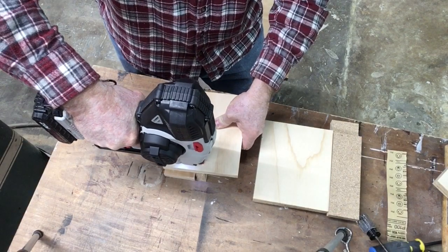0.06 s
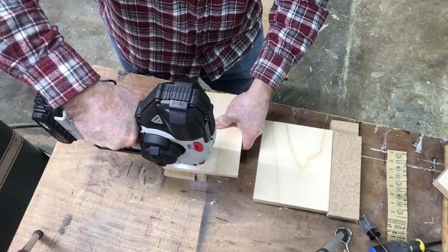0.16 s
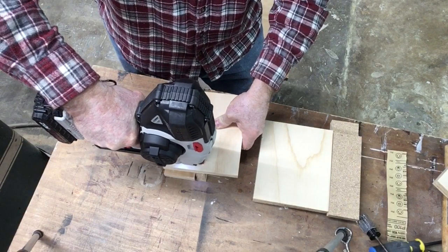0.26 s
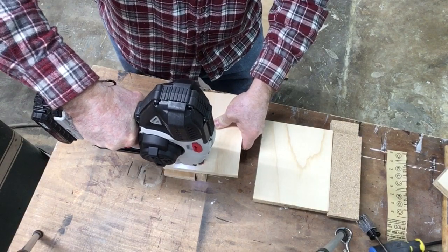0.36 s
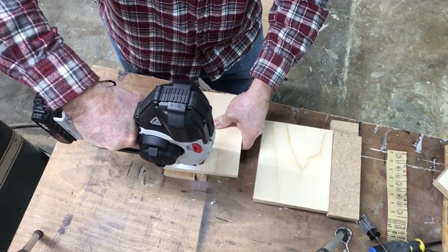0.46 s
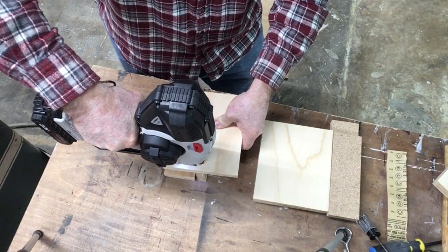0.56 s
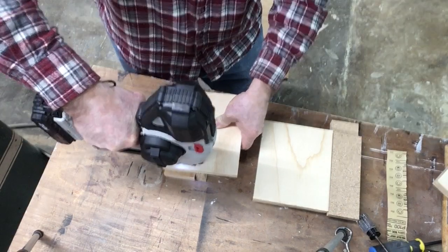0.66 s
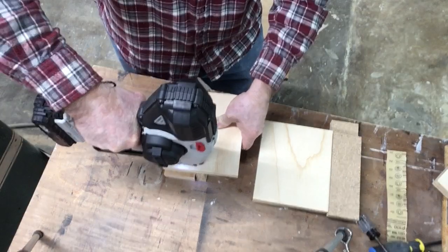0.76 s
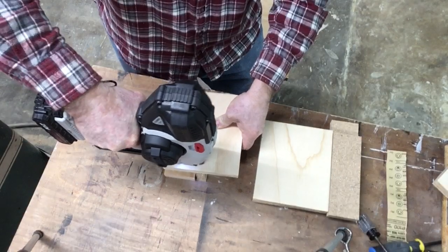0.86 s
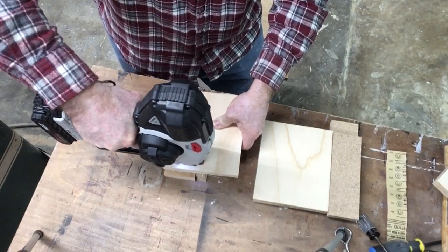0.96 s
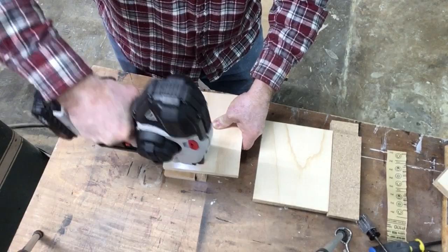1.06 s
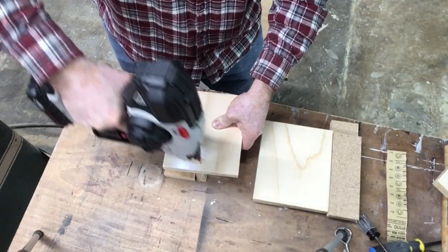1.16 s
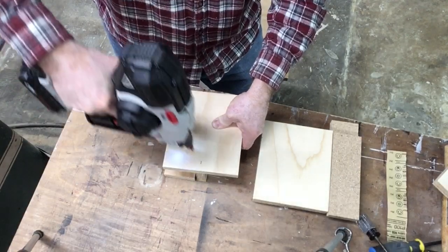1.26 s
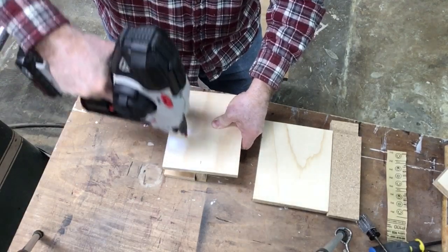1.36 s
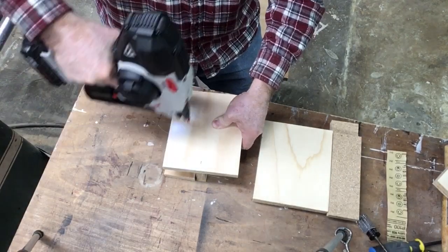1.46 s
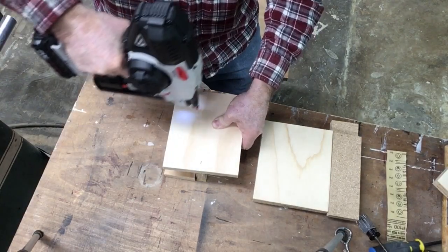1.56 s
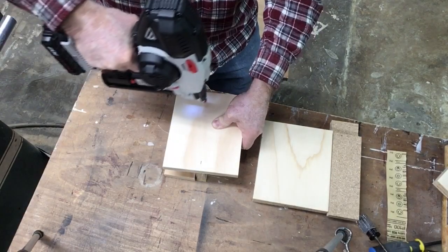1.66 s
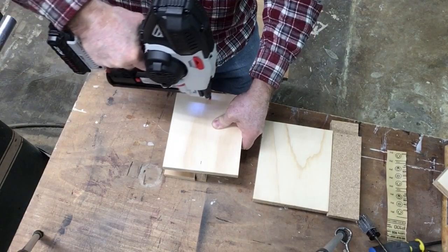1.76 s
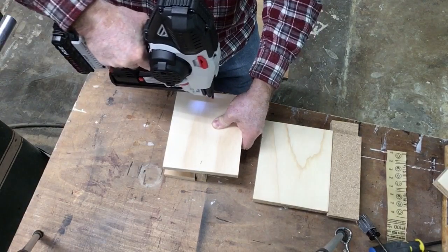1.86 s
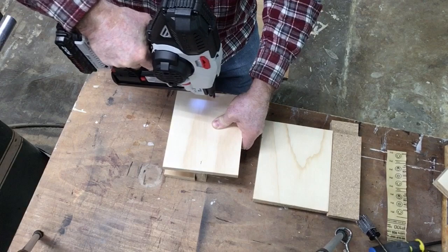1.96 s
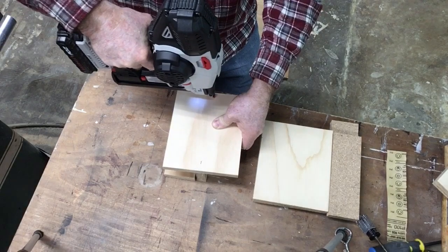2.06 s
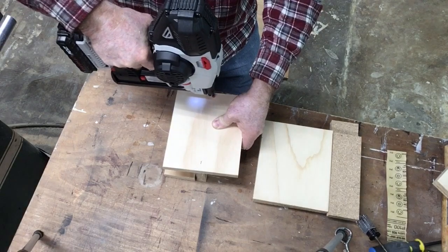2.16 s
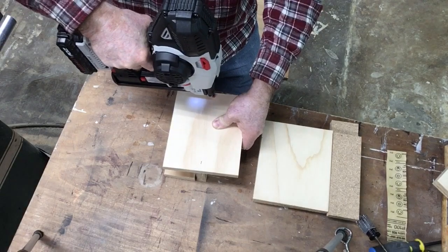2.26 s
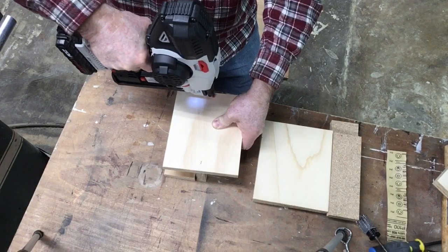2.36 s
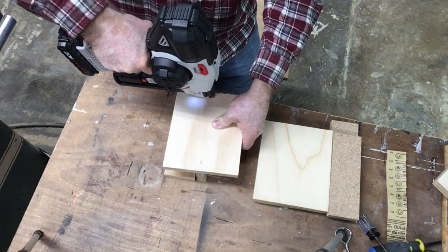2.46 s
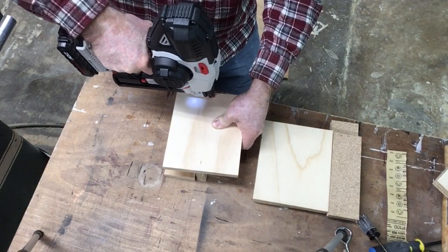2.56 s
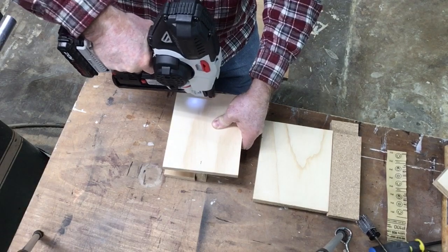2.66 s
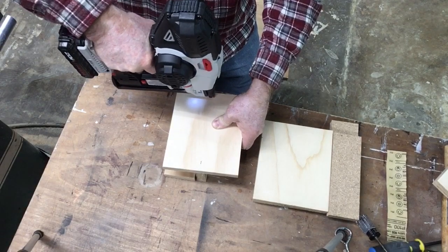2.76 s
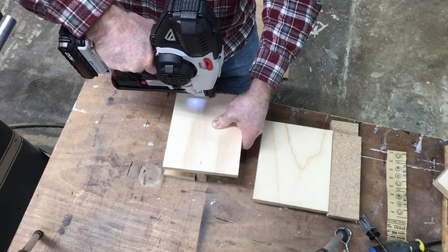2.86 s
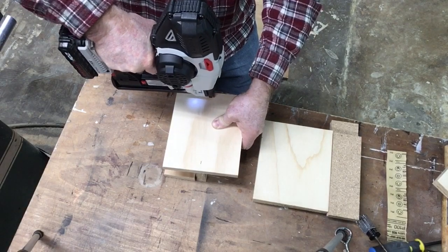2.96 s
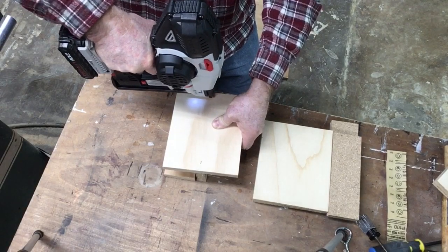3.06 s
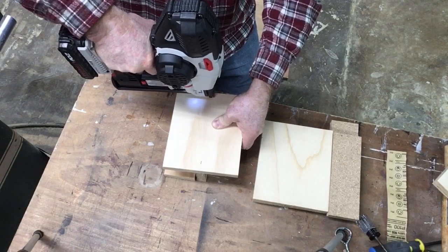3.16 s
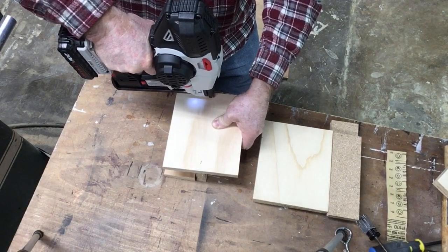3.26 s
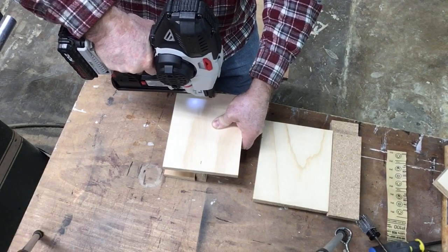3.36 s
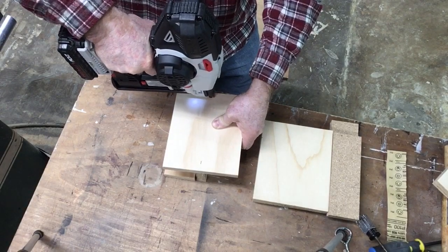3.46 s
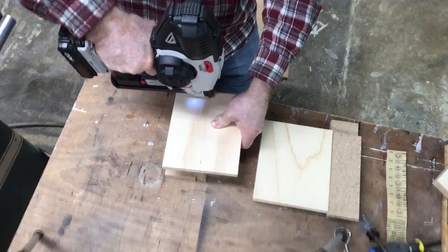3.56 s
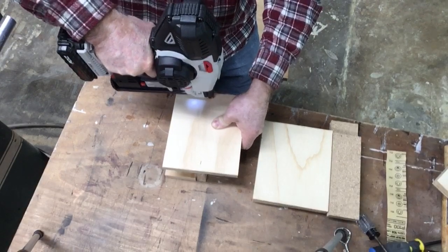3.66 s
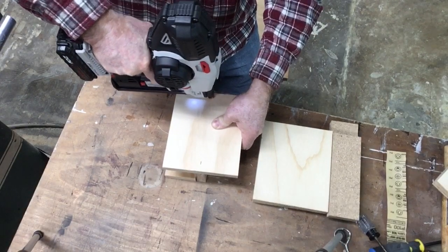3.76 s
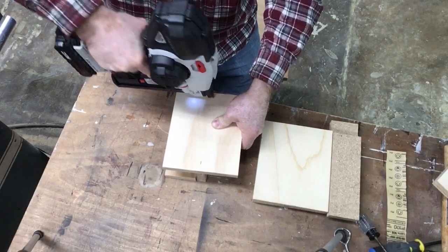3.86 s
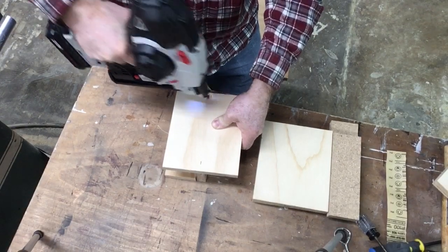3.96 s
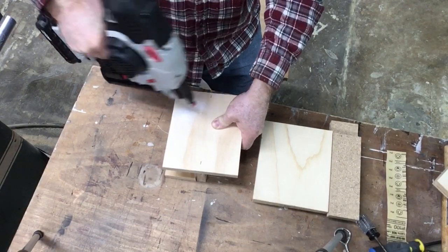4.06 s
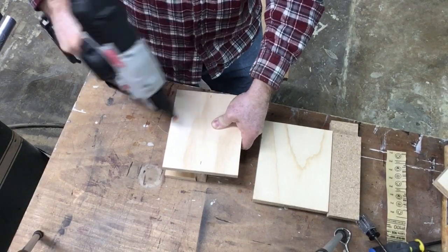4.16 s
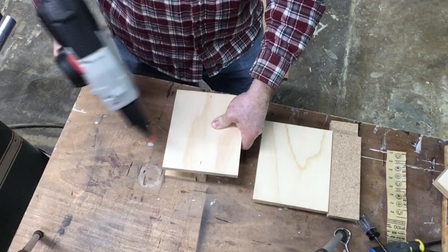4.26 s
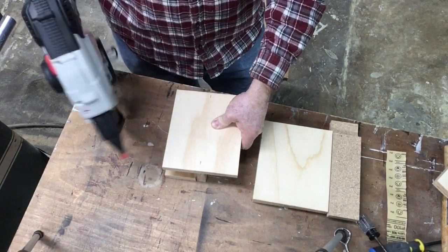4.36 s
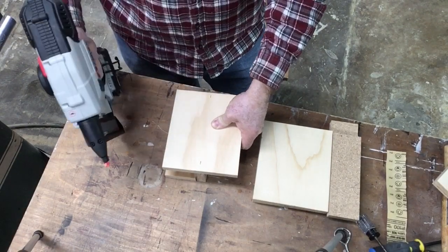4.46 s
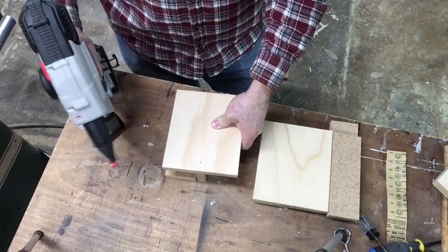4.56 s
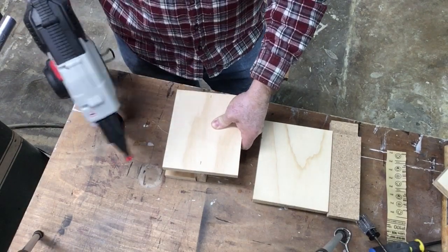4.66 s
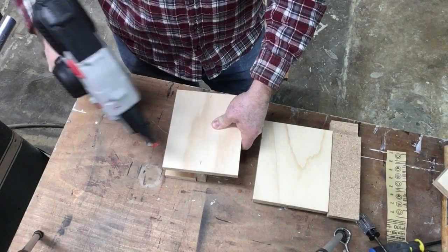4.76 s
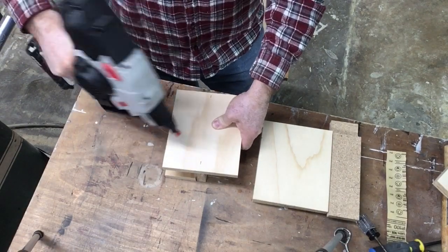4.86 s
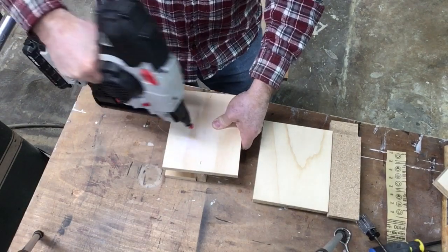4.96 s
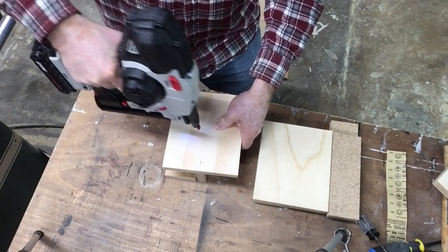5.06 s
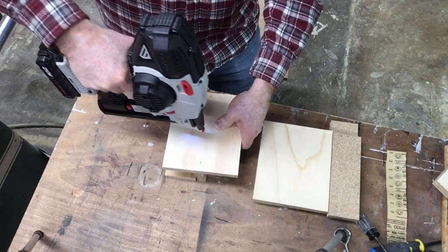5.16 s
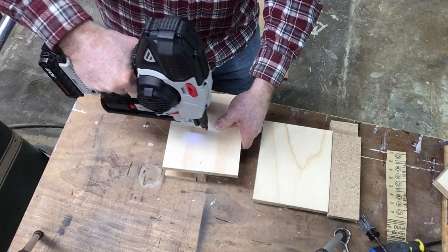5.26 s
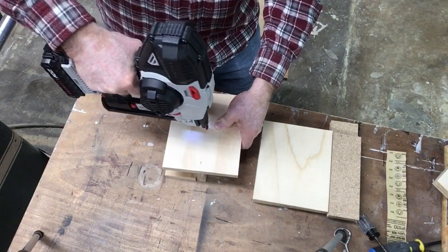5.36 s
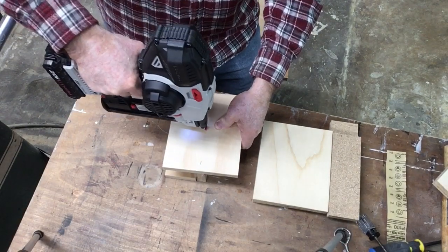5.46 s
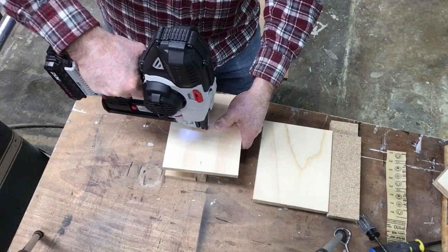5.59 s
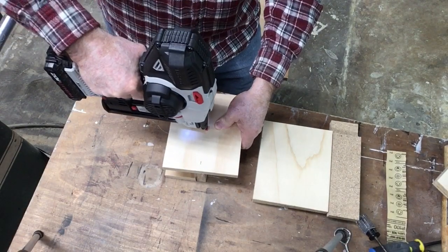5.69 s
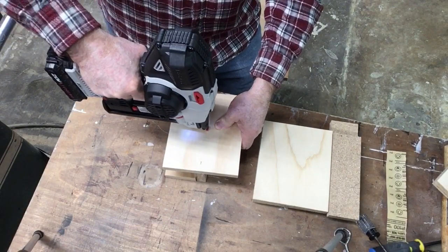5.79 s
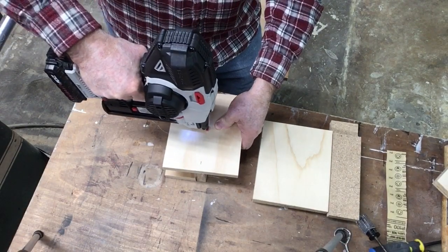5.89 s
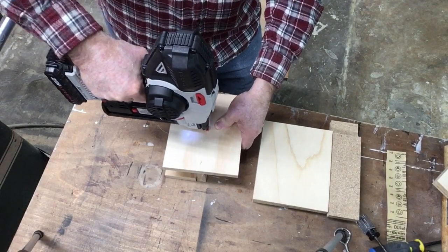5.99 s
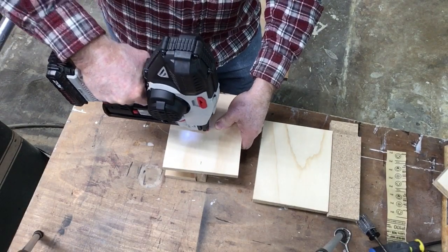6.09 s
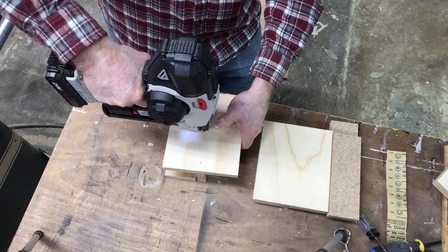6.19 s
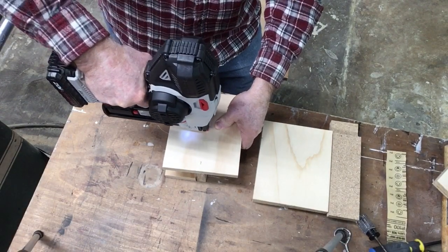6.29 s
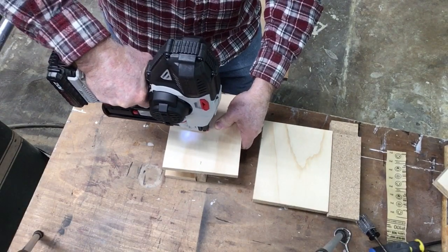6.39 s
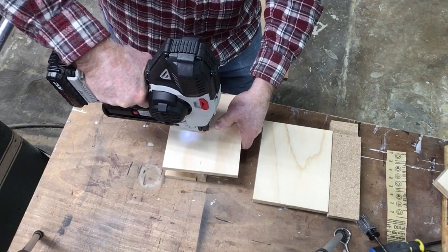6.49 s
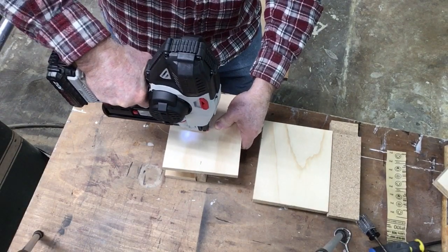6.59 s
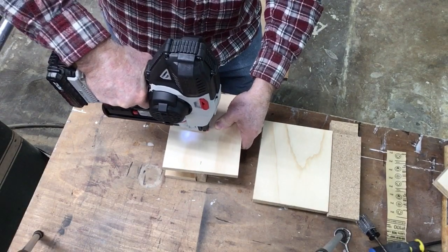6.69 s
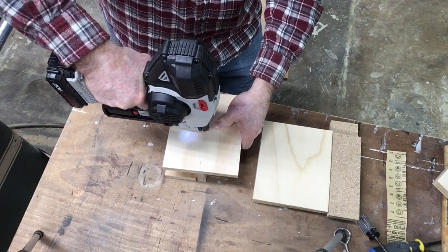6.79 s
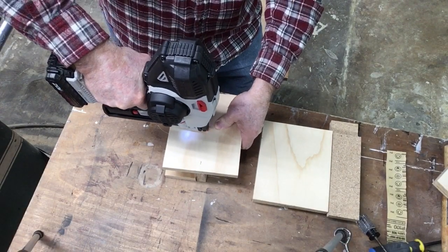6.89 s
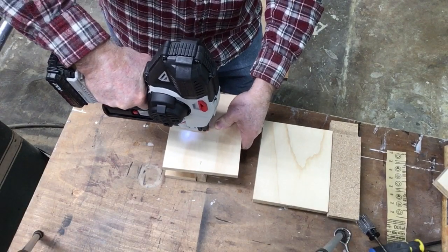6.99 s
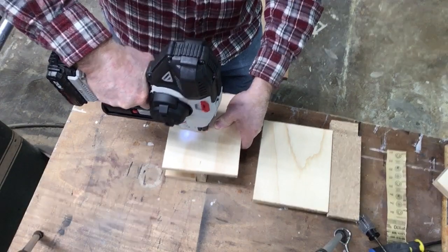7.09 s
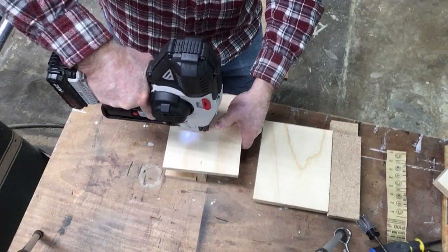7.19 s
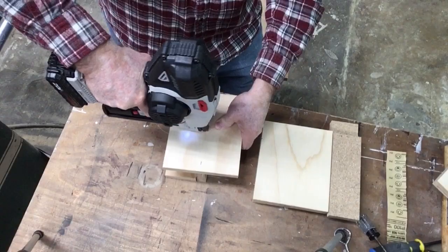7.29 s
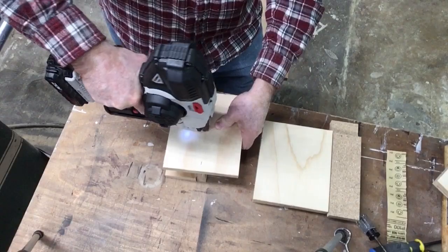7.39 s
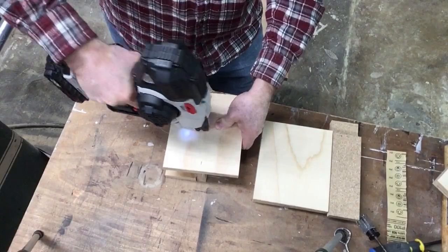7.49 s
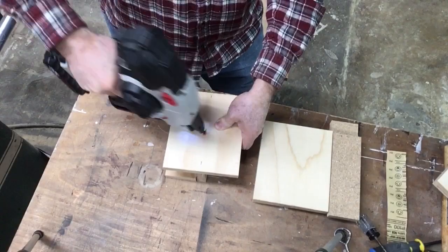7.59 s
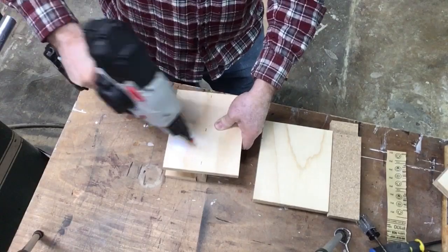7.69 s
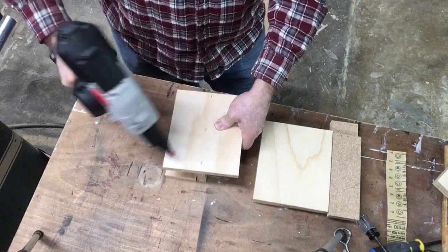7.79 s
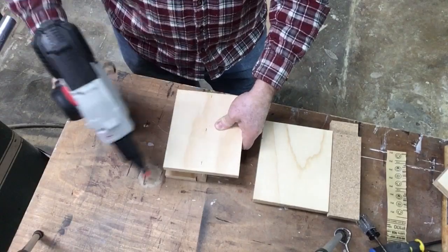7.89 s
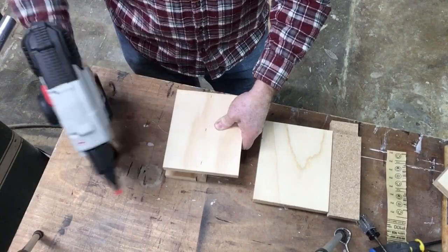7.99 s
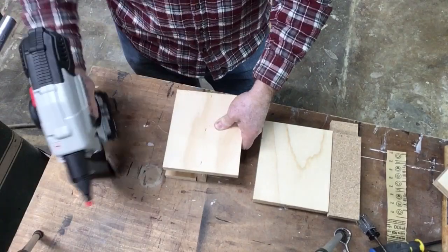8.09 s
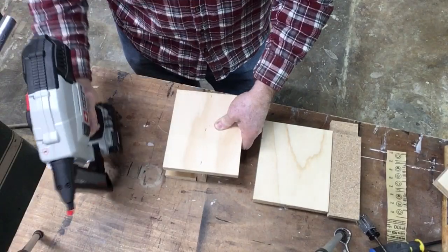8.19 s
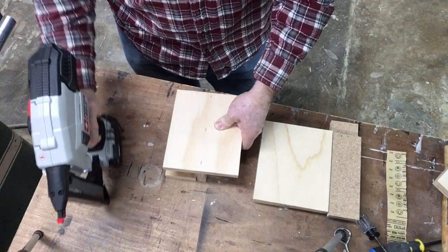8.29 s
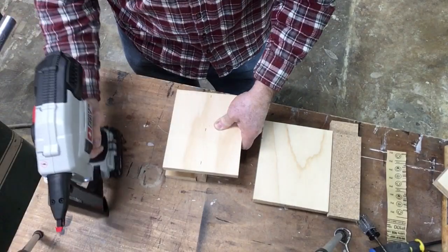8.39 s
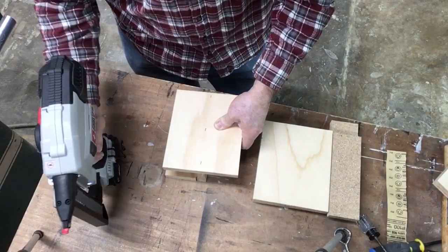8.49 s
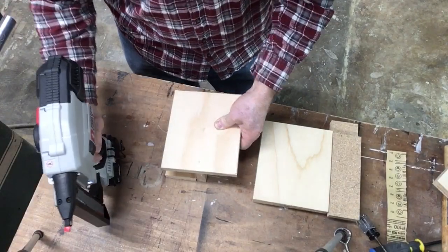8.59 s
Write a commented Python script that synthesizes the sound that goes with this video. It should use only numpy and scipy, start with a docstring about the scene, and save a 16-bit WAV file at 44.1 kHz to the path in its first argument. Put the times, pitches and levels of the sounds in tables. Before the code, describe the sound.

A flywheel nail gun on a wooden bench, closely miked, with short dry room reflections and very quiet still air. A click, a third of a second of climbing electric whine, a violent crack, then a falling, chattering coast-down; this happens three times, about three seconds apart. Between shots come faint plastic and steel clicks, light taps, small rubs and creaks, and dull presses on the board. Finally, soft low bumps.

```python
"""A cordless flywheel nailer drives three brads into a pine board on a workbench, close to the microphone.
For each shot the trigger clicks, the motor whines up with the flywheel, the driver slams and the wheel coasts down.
After each shot the gun is lifted with clicks; before the next it is set down and pressed home, and the bench sways.
Light taps, rubs and creaks fill the gaps; after the last lift the gun is laid down with soft bumps.
A small workshop answers everything, over its still air."""
import sys
import numpy as np
from scipy import signal
from scipy.fft import rfft, irfft, next_fast_len
from scipy.io import wavfile
from scipy.ndimage import uniform_filter1d

SR = 44100
rng = np.random.default_rng(int(sys.argv[2]) if len(sys.argv) > 2 else 0)


def transcribe(signal):
    """Save signal, clipped to [-1, 1], as a 16-bit WAV file at the path in sys.argv[1]."""
    frames = np.atleast_2d(signal).T
    limited = np.clip(frames, -1, 1)
    pcm = np.round(limited * 32767).astype(np.int16)
    wavfile.write(sys.argv[1], SR, pcm)


N = 381024
TIME = np.arange(N) / SR
BRIEF = TIME[:SR // 2]
TOP_HZ = 15900  # upper edge of the sound

# All levels are relative: a sound's own level and the levels of its parts add up.

# still air of the room: pitch_hz, level_db
AIR_SPECTRUM = [(12, -49.5), (20, -18), (65, -3), (222, -21), (255, -15.5), (319, -25.5), (1330, -28.5),
                (1660, -33.5), (16000, -44)]
# how long the room rings: pitch_hz, t60_s (time to fall by 60 dB)
ROOM_DECAY = [(100, .4), (500, .33), (2000, .35), (6000, .3), (15000, .2)]
# a narrow dip in the treble of the microphone: pitch_hz, level_db
MICROPHONE_RESPONSE = [(9700, 1), (10350, -2.5), (10900, 0)]

# bench top and frame: pitch_hz, level_db, t60_s
BENCH_MODES = [(61, -8, .22), (90, -8, .1), (115, -1, .13), (163, -10, .14), (203, -20, .25)]
# hollow knock of the bench top: pitch_hz, level_db
BENCH_KNOCK = [(150, 9), (400, 0.5), (750, 7), (1200, -22.0)]
# soft bumps on the bench, the loudest as the gun is laid down: time_s, level_db
BUMP_TIMES = [(5.099, -25), (8.4587, 1), (8.465, -1.5), (8.547, -11)]
# brief creaks of grip and bench, each on one resonance: time_s, pitch_hz, level_db
CREAK_TIMES = [(1.849, 2720, -54), (5.058, 419, -43.5), (5.172, 2763, -44), (5.295, 1900, -51.5),
               (6.154, 2370, -47), (6.718, 4567, -51)]
# the gun shifts in the hand or slides on the bench: middle_s, half_length_s, level_db, scrape_db (bright share)
RUB_TIMES = [(5.12, 0.1, -65.5, -1.5), (5.81, 0.065, -64, -17), (6.14, 0.061, -63.5, -21),
             (8.57, 0.093, -51.5, -10)]
# dull drag and bright scrape of a rub: pitch_hz, level_db
DRAG_SPECTRUM = [(100, 12.5), (350, 3.5), (1100, 6.0), (2500, -7.5), (15000, -21)]
SCRAPE_SPECTRUM = [(900, -10), (2600, 2), (6000, -3), (13000, -2), (16000, -8)]
# single light taps, mostly as the gun is handled; those at 0.883 and 3.749 s are the driver clicking back into
# place after a blow: time_s, level_db, wood_db, steel_db (shares of wood and steel)
TAP_TIMES = [(0.883, -27, -19, -18), (2.2505, -44.5, -0.5, -31.5), (2.313, -38.5, -11, -14),
             (2.44, -53, 5.5, -58), (2.487, -39, -8, -18), (2.538, -36.5, 0, -7), (2.807, -50, -40, -2),
             (3.749, -32.5, -10, -16), (4.498, -47.5, -3, -13), (4.984, -47, -7, -21.5),
             (5.855, -34.5, -18.5, -42), (6.385, -39.5, -10.5, -37.5), (6.422, -38.5, -25, -40),
             (6.457, -41, -12.5, -30), (8.1, -46, -7, -27)]

# Each move of the hand is a fixed run of contacts: delay_s (from the move's time), knock_db, clack_db, tick_db
# the trigger takes up its slack, clicks and hits its stop
TRIGGER_CONTACTS = [(-.017, -94, -60, -53), (0, -66, -52, -34.5), (.01, -53, -48.5, -56.5)]
# the nose meets the board, slides in and seats
TOUCH_CONTACTS = [(0, -40, -45, -45.5), (.005, -54, -40, -34), (.0105, -54.5, -29.5, -48),
                  (.02, -36.5, -38, -72)]
# the pressed nose trips the safety switch and bottoms out
PRESS_CONTACTS = [(-.035, -48, -36, -39.5), (0, -34, -28.5, -40)]
# the freed nose springs out and bounces on its stop
LIFT_CONTACTS = [(0, -39, -28.5, -42), (.008, -38, -34, -29.5), (.015, -49, -28.5, -43.5),
                 (.0255, -44, -31, -32)]
# the trigger is pulled: time_s, level_db, stretch (multiplies the contact delays)
PULL_TIMES = [(0.3435, 0.5, 1.2), (3.2178, 1, .95), (6.753, 1, 1.75)]
# the gun is set on the board: time_s, level_db, stretch, wait_s (until its weight lands)
TOUCH_TIMES = [(2.2696, -5, 0.88, 0.013), (5.611, -2, 1, .055)]
# it is pressed home: time_s, level_db, stretch, hollow_db (hollow knock of the bench)
PRESS_TIMES = [(2.5591, -0.5, 0.97, 6.5), (6.2155, -0.5, 0.96, 8)]
# it is lifted off: time_s, level_db, stretch
LIFT_TIMES = [(1.191, -1, 1.14), (3.9844, -6, 1), (7.6423, -0.5, 0.79)]
# the free nose snaps against its stop and rings: time_s, level_db
SNAP_TIMES = [(5.679, -2.5), (5.804, -18)]
# the board under a light knock, before each spot's own detuning: pitch_hz, level_db, t60_s
KNOCK_MODES = [(500, -6, .035), (880, -3, .035), (1150, -4, .035)]
# the struck plastic shell, before each spot's own detuning: pitch_hz, level_db, t60_s
CLACK_MODES = [(1420, -5, 0.011), (1994, -6, 0.01), (2410, -3, 0.024), (3160, -6.5, 0.011),
               (4910, -7.5, 0.0112)]
# the steel safety nose: pitch_hz, level_db, t60_s
NOSE_MODES = [(3972, -2.5, 0.17), (7200, 0, 0.15), (11000, -1, 0.12), (14200, 4, 0.088)]
# the trigger's spring: pitch_hz, level_db, t60_s
SPRING_MODES = [(4370, 0, .012), (6700, -2, .01)]
# noisy part of a knock, a clack and a tick: pitch_hz, level_db
KNOCK_GRIT = [(250, -7.0), (480, -5.5), (1200, 1), (3000, -29)]
CLACK_GRIT = [(700, -20), (1500, 0), (5000, -4), (9000, -22)]
TICK_SPECTRUM = [(4000, -20.5), (6600, 0), (11000, -3.5), (16000, -17)]

# the three shots: start_s (motor), blow_s, blow_db, hollow_db (hollow knock of the board),
# loose_db (loose steel on the bench), whirr_db (bearings), whirr_s (length), speed_turns_per_s (left after the blow)
SHOT_TIMES = [(0.356, 0.729, -3.5, -9, -57.5, -59, 0.932, 87.7),
              (3.232, 3.608, -5.5, -8.5, -72.5, -60.5, 1.374, 93.1),
              (6.77, 7.145, -3.5, -15.5, -70, -60, 1.3, 93.1)]
# contacts within a shot, from the driver's grab to its return: delay_s (after the blow), crack_db, wood_db, thump_db
STROKE_CONTACTS = [(-.008, -23, -28.5, -52.5), (0, -12, -8.5, -41), (.003, -11, -13.5, -41),
                   (.009, -9.5, -8.5, -31.5), (0.0176, -13, -8.5, -5.5), (.025, -15.5, -16, -23.5),
                   (.032, -18, -21, -27), (0.0403, -13.5, -14, -11.5)]
# crack of the driver: pitch_hz, level_db (per Hz)
CRACK_SPECTRUM = [(70, -25.5), (160, -10), (300, -18), (589, -11), (960, -3.5), (2200, -9.5), (6390, -15.5),
                  (12600, -16), (16000, -31.5)]
# board and gun body, before the hand damps them: pitch_hz, level_db, t60_s
WOOD_MODES = [(294.3, -4.5, 0.96), (386, -9, .2), (542, -6, 0.36), (700, -8.5, 0.081), (793, -2.5, 0.12),
              (962, 3.5, .3), (1074, -3, 0.23), (1407, -3.5, 0.04), (1603, 0, 0.46), (1884, -6, 0.18),
              (2283, -3.5, 0.24), (3370, -7.5, 0.22)]
# crunch of the nail and hollow knock of the board: pitch_hz, level_db
CRUNCH_SPECTRUM = [(150, -27), (500, -13.0), (950, 2), (1250, -6.0), (1600, -1), (3000, -21.5)]
HOLLOW_SPECTRUM = [(200, -27.5), (380, -8.5), (560, 3.5), (850, -26.0)]
# loose steel on the bench: pitch_hz, level_db, t60_s
LOOSE_MODES = [(735, 0, 3.4), (1160, -6, 1.8), (1335, -4, 3)]

# resonances of the shell that the whine sweeps through: pitch_hz, level_db
WHINE_SPECTRUM = [(300, -12.5), (1030, 0.5), (1600, -10), (2100, 6), (2600, -3), (3100, 1), (4800, -4),
                  (6300, -1.5), (8500, -5), (11300, 2.5), (16000, 2)]
# side tones of the slightly uneven rotor: multiple (of the speed), level_db
ROTOR_TONES = [(6, -5), (13, -3), (21, -3), (22, -2), (23, -3), (27, -4)]
# housing, colouring the brush hiss and the rim: pitch_hz, level_db
HOUSING_SPECTRUM = [(120, -34), (200, -12), (950, -1), (3200, -6), (5000, -11.5), (11300, -7.5),
                    (16000, -13)]
# extra colour of the rim's buzz: pitch_hz, level_db
BUZZ_SPECTRUM = [(600, -14), (1300, -7), (2500, 0), (9000, -2)]
# overtones of the coasting wheel: pitch_hz, level_db
SCUFF_SPECTRUM = [(500, -14.5), (2300, 0), (4500, -9), (16000, -36)]
# noise of the wheel's chatter: pitch_hz, level_db (per Hz)
CHATTER_SPECTRUM = [(120, -36.5), (200, -3.5), (424, -10.5), (700, -3.5), (2470, -9.5), (5130, -12),
                    (14100, -14), (16000, -26)]
# treble part of the chatter: pitch_hz, level_db
TREBLE_SPECTRUM = [(2000, -20), (12000, 0)]
# whirr of the bearings: pitch_hz, level_db (per Hz)
BEARING_SPECTRUM = [(240, -45), (420, -10.5), (839, -8.5), (1060, 0.5), (1300, -6), (1900, -8.5),
                    (2300, -2), (2800, -7.5), (3200, -2), (3700, -6.5), (4400, -3), (6200, -7), (9600, -11),
                    (16000, -29.5)]

# motor under power: speed it climbs towards (turns per s), time constant of the climb (s), level and its attack
TOP_SPEED, SPIN_UP_S, DRIVE_DB, DRIVE_ATTACK_S = 222, .29, -34.5, 0.074
SEGMENTS, SCUFFS = 12, 6  # commutator ticks and scuffs of the wheel in one turn
BRUSH_DB, BUZZ_DB, SWEEP_DB, RIPPLE_DB, SIDE_DB = -6, -5, -1.8, 1, -11.5  # parts of the motor sound
SHELL_HZ, BENCH_TURNS = 1030, 129  # shell resonance; wheel speed (turns per s) that shakes the bench most
# free-running wheel: time to a stop (s), speed under which its chatter dies (turns per s)
STOP_S, QUIET_SPEED = 1.13, 40
# its chatter is muted until the driver is back in place (s after the blow)
CHATTER_DB, MUTED_DB, DRIVER_BACK_S = -48, -9, .21
FREE_STEEL_DB = -19  # ring of the nose against its tick when it is free
SPRING_DB = -28


def amp(db):
    """Decibels to gain."""
    return 10 ** (np.asarray(db) / 20)


def unit(x):
    """Scale x to an rms (average strength) of 1."""
    return x / np.sqrt(np.mean(x ** 2) + 1e-20)


def fade(t, t60):
    """Exponential decay that falls by 60 dB in t60 seconds."""
    return np.exp(-np.log(1000) * t / t60)


def along(points, hz):
    """Read a curve of (pitch, value) points, with pitch on a log axis."""
    pitches, values = np.transpose(points)
    return np.interp(np.log(hz + 1), np.log(pitches + 1), values)


def filtered(x, response):
    """Change the strength of each frequency in x by a response function."""
    size = next_fast_len(len(x) + SR // 4)
    hz = np.fft.rfftfreq(size, 1 / SR)
    return irfft(rfft(x, size) * response(hz), size)[:len(x)]


def coloured(x, spectrum):
    """Pass x through a spectrum table."""
    return filtered(x, lambda hz: amp(along(spectrum, hz)))


def noise(spectrum, size):
    """Noise of rms 1 with a given spectrum."""
    return unit(coloured(rng.standard_normal(size), spectrum))


def wobble(size):
    """A random curve of rms 1, smoothed over size samples."""
    return unit(uniform_filter1d(rng.standard_normal(N), size=size))


def band_limit(hz):
    """Gain of a steep low-pass at the top of the band."""
    return 1 / np.sqrt(1 + (hz / TOP_HZ) ** 300)


def add(track, s, sound):
    """Mix a sound into the track at time s."""
    part = track[max(round(s * SR), 0):][:len(sound)]
    part += sound[:len(part)]


def ring(modes, t, rise=.0005, scatter=1):
    """Struck resonances, at slightly new strengths for every blow; scatter 0-1 loosens their phases."""
    tones = np.zeros(len(t))
    for hz, db, t60 in modes:
        strength = amp(db + rng.normal(0, 0.51))
        tones += strength * fade(t, t60) * np.sin(2 * np.pi * (hz * t + scatter * rng.random()))
    return tones * (1 - np.exp(-t / rise))


def stack(cycles, hz, spectrum, count):
    """Overtones of a gliding pitch, each coloured by the resonance it is passing."""
    out = np.zeros(len(cycles))
    for k in range(1, count + 1):
        level = amp(along(spectrum, k * hz)) * band_limit(k * hz) / (1 + (2 * k / count) ** 4)
        out += level * np.sin(2 * np.pi * (k * cycles + rng.random()))
    return out


def ticks(turns, sizes):
    """One pulse for each rough spot of a rim as it passes; the sizes repeat every turn."""
    k = np.arange(int(turns[-1] * len(sizes)))
    when = np.interp(k / len(sizes), turns, np.arange(len(turns)))
    # a short smooth pulse places each tick between samples
    places = when.astype(int)[:, None] + np.arange(-7, 9)
    lag = places - when[:, None]
    kernel = np.sinc(lag) * np.cos(np.pi * lag / 16) ** 2
    pulses = kernel * sizes[k % len(sizes), None]
    return np.bincount(np.abs(places).ravel(), pulses.ravel(), len(turns))[:len(turns)]


def shell(x, t60, direct):
    """The plastic shell smears each pulse over its many short resonances."""
    body = rng.standard_normal(len(BRIEF)) * fade(BRIEF, t60)
    return direct * x + signal.fftconvolve(x, body / np.linalg.norm(body))[:len(x)]


def workshop(x):
    """The room's answer: a noise tail whose highest treble dies first."""
    hz, t, z = signal.stft(rng.standard_normal(SR // 2), SR, nperseg=256)
    decay = fade(t, along(ROOM_DECAY, hz)[:, None])
    tail = signal.istft(z * decay, SR, nperseg=256)[1]
    tail *= 1 - np.exp(-TIME[:len(tail)] / 0.0013)
    return signal.fftconvolve(x, tail / np.linalg.norm(tail))[:N]


def lean(thud_db, sway_db, knock_db):
    """Under the gun's weight the bench top knocks and thuds and the frame sways."""
    t = BRIEF
    # a soft 50 Hz swell, strongest 85 ms in
    sway = np.sin(2 * np.pi * 50 * t) * np.exp(-((t - .085) / .065) ** 2)
    knock = noise(BENCH_KNOCK, len(t)) * fade(t, 0.053)
    thud = ring(BENCH_MODES, t, rise=0.0033, scatter=0) + amp(knock_db) * knock
    return amp(sway_db) * sway + amp(thud_db) * thud


def bench():
    """The bench takes a little weight at each touch, and more at each press and when the gun is laid down."""
    out = np.zeros(N)
    for s, _, _, wait in TOUCH_TIMES:
        add(out, s + wait, lean(thud_db=-42.0, sway_db=-57.0, knock_db=-24))
    for s, db, _, hollow_db in PRESS_TIMES:
        add(out, s, amp(db) * lean(thud_db=-30.5, sway_db=-39.5, knock_db=hollow_db))
    for s, db in BUMP_TIMES:
        add(out, s, amp(db) * lean(thud_db=-34, sway_db=-43.5, knock_db=-4.0))
    return out


def creaks():
    """Small slips of grip and bench; each sounds one narrow resonance."""
    out, t = np.zeros(N), BRIEF
    for s, hz, db in CREAK_TIMES:
        peak = [(hz / 2, -30), (hz / 1.15, -12), (hz, 0), (hz * 1.15, -12), (2 * hz, -30)]
        shape = fade(t, 0.032) * (1 - np.exp(-t / 0.0033))
        add(out, s, amp(db) * noise(peak, len(t)) * shape)
    return out


def rubs():
    """Plastic and wood rub in small uneven slips whenever the nose slides or the gun shifts."""
    slides = [(s - .028, .028, db - 52.5, -12) for s, db, *_ in PRESS_TIMES]
    slides += [(s + 0.0024, .024, db - 55, -12) for s, db, _ in LIFT_TIMES]
    drag = noise(DRAG_SPECTRUM, N)
    scrape = noise(SCRAPE_SPECTRUM, N)
    strokes = np.zeros(N)
    for s, half, db, scrape_db in slides + list(RUB_TIMES):
        swell = np.exp(-((TIME - s) / half) ** 2)
        strokes += amp(db) * swell * (drag + amp(scrape_db) * scrape)
    return strokes * unit(amp(3 * wobble(size=150)))


def detuned(modes):
    """Each spot struck has its own pitches, about a tenth off the table."""
    return [(hz * (1 + rng.normal(0, .1)), db, t60) for hz, db, t60 in modes]


def contact(knock_db, clack_db, tick_db, steel_db=-32):
    """A contact knocks the board, clacks the plastic shell and ticks the steel nose, which also rings."""
    t = TIME[:SR // 4]
    grit = amp(-5)
    knock = ring(detuned(KNOCK_MODES), t) + grit * noise(KNOCK_GRIT, len(t)) * fade(t, 0.069)
    clack = ring(detuned(CLACK_MODES), t) + grit * noise(CLACK_GRIT, len(t)) * fade(t, .03)
    tick = noise(TICK_SPECTRUM, len(t)) * fade(t, 0.015)
    burst = amp(knock_db + 6) * knock + amp(clack_db + 7) * clack + amp(tick_db + 7.5) * tick
    burst *= 1 - np.exp(-t / 0.00092)
    return burst + amp(tick_db + steel_db) * ring(NOSE_MODES, t)


def taps():
    """Single light contacts, each with its own share of wood and steel."""
    out = np.zeros(N)
    for s, db, wood_db, steel_db in TAP_TIMES:
        add(out, s, contact(knock_db=db + wood_db - 3, clack_db=db - 13, tick_db=db + steel_db + 1))
    return out


def handling():
    """The gun is set down, pressed, triggered, lifted and laid aside, each move a run of small contacts."""
    out = np.zeros(N)
    # the nose rings more strongly as it touches down
    moves = [(TOUCH_CONTACTS, TOUCH_TIMES, FREE_STEEL_DB), (PRESS_CONTACTS, PRESS_TIMES, -32),
             (TRIGGER_CONTACTS, PULL_TIMES, -32), (LIFT_CONTACTS, LIFT_TIMES, -32)]
    for contacts, times, steel_db in moves:
        for s, db, stretch, *_ in times:
            for delay, knock_db, clack_db, tick_db in contacts:
                add(out, s + stretch * delay, amp(db) * contact(knock_db, clack_db, tick_db, steel_db))
    for s, db, _ in PULL_TIMES:
        add(out, s, amp(db + SPRING_DB) * ring(SPRING_MODES, BRIEF))
    for s, db in SNAP_TIMES:
        add(out, s, amp(db) * contact(knock_db=-37.5, clack_db=-29, tick_db=-30.5, steel_db=FREE_STEEL_DB))
    for s, db in BUMP_TIMES:
        add(out, s, amp(db) * contact(knock_db=-37.5, clack_db=-47, tick_db=-70))
    return out


def wind_up(length):
    """The motor nears its top speed: twelve commutator ticks a turn, brush hiss and the hum of unbalance."""
    t = TIME[:round(length * SR)]
    speed = TOP_SPEED * (1 - np.exp(-t / SPIN_UP_S))
    turns = np.cumsum(speed) / SR
    pace = speed / speed[-1]
    # the commutator runs slightly off centre, so each overtone has side tones one turn apart
    swing = turns + .0012 * np.sin(2 * np.pi * turns)
    overtones = stack(SEGMENTS * swing, SEGMENTS * speed, WHINE_SPECTRUM, count=24)
    overtones = shell(overtones, t60=.02, direct=1.2)
    whine = amp(SWEEP_DB) * unit(overtones * pace ** 0.31 * amp(wobble(size=250)[:len(t)]))
    # torque ripple sings out as it sweeps through the shell's main resonance
    resonance = 1 / np.hypot(1, (SEGMENTS * speed - SHELL_HZ) / 110)
    ripple = amp(RIPPLE_DB) * np.sin(2 * np.pi * SEGMENTS * turns) * resonance
    brushes = amp(BRUSH_DB) * noise(HOUSING_SPECTRUM, len(t))
    rotor = sum(amp(db) * np.sin(2 * np.pi * (k * turns + rng.random())) for k, db in ROTOR_TONES)
    side = amp(SIDE_DB) * pace ** 2 * rotor
    # the wheel's rim repeats the same roughness every turn: a buzz of closely spaced partials
    rim = coloured(ticks(turns, rng.standard_normal(size=96)), HOUSING_SPECTRUM)
    buzz = amp(BUZZ_DB) * unit(coloured(shell(rim, t60=.012, direct=1), BUZZ_SPECTRUM))
    level = amp(DRIVE_DB) * (1 - np.exp(-t / DRIVE_ATTACK_S))
    motor = level * (whine + ripple + brushes + side + buzz)
    # the unbalanced wheel shakes the bench most when it passes the top's resonance
    unbalance = pace ** 2 / np.hypot(1, (speed - BENCH_TURNS) / 7)
    return motor + amp(-28) * unbalance * np.sin(2 * np.pi * turns)


def coast(whirr_db, whirr_length, first_speed):
    """Friction slows the wheel: six scuffs a turn make a falling whine, over the whirr of its bearings."""
    t = TIME[:round(max(STOP_S, whirr_length) * SR)]
    speed = first_speed * np.clip(1 - t / STOP_S, 0, 1) ** 1.5
    speed = np.maximum(speed, 1)  # stay above zero for the divisions below
    turns = np.cumsum(speed) / SR
    muted = np.clip(.5 + (DRIVER_BACK_S - t) / 0.043, 0, 1)
    level = amp(CHATTER_DB + MUTED_DB * muted) / np.hypot(1, (QUIET_SPEED / speed) ** 2)
    overtones = stack(SCUFFS * turns, SCUFFS * speed, SCUFF_SPECTRUM, count=30)
    tone = unit(level * shell(overtones, t60=.02, direct=1))
    pulsing = amp(3.4 * np.cos(2 * np.pi * SCUFFS * turns))
    scuffs = unit(level * noise(CHATTER_SPECTRUM, len(t)) * pulsing)
    loudness = np.sqrt(np.mean(level ** 2))
    chatter = loudness * (amp(-.5) * scuffs + amp(-5.5) * tone)
    # while the wheel is fast, the treble swells every second turn
    treble = coloured(chatter, TREBLE_SPECTRUM)
    flutter = .7 * treble * np.sin(np.pi * turns) * speed / speed.max()
    # the balls rattle unevenly in the shell's narrow resonances
    balls = shell(noise(BEARING_SPECTRUM, len(t)), t60=.025, direct=2)
    rattle = unit(balls * amp(1.5 * wobble(size=300)[:len(t)]))
    run_out = np.sqrt(np.clip((whirr_length - t) / 0.64, 0, 1))
    return chatter + flutter + amp(whirr_db) * rattle * run_out


def blow(hollow_db):
    """The driver's contacts crack, crunch into the board and thump the bench."""
    out, t = np.zeros(SR), BRIEF
    # steel on steel: a sharp first instant, then two slower tails
    crack_shape = fade(t, .005) + fade(t, 0.061) + amp(-27.5) * fade(t, 0.2)
    for delay, crack_db, wood_db, thump_db in STROKE_CONTACTS:
        crack = noise(CRACK_SPECTRUM, len(t)) * crack_shape
        crunch = noise(CRUNCH_SPECTRUM, len(t)) * fade(t, .075)
        hollow = noise(HOLLOW_SPECTRUM, len(t)) * fade(t, 0.16)
        # the hand on the board damps its resonances
        modes = amp(-10.5) * ring(WOOD_MODES, t) * fade(t, .2)
        wood = modes + amp(-3.0) * crunch + amp(hollow_db) * hollow
        thump = ring(BENCH_MODES, t, rise=0.0012, scatter=0)
        hit = amp(crack_db + 3.5) * crack + amp(wood_db) * wood + amp(thump_db) * thump
        add(out, delay - STROKE_CONTACTS[0][0], hit)
    # the deepest bass of the blow is cut away
    return signal.sosfilt(signal.butter(3, 65, "highpass", fs=SR, output="sos"), out)


def nailer():
    """Each shot is a wind-up, a blow, a coasting wheel and the ring of loose steel on the bench."""
    out = np.zeros(N)
    for start, hit, db, hollow_db, loose_db, whirr_db, whirr_length, speed in SHOT_TIMES:
        add(out, start, wind_up(hit - start))
        add(out, hit + STROKE_CONTACTS[0][0], amp(db) * blow(hollow_db))
        add(out, hit, coast(whirr_db, whirr_length, speed))
        add(out, hit, amp(loose_db) * ring(LOOSE_MODES, TIME[:4 * SR]))
    return out


def scene():
    """Gun and bench close by, the room and its still air behind."""
    near = bench() + creaks() + rubs() + taps() + handling() + nailer()
    air = noise(AIR_SPECTRUM, N)
    return (near + amp(-14.0) * workshop(near) + amp(-64.5) * air)[None]


def record(dry):
    """The microphone colours the treble, the loudest peaks are rounded off and a steep filter ends the band."""
    heard = coloured(dry[0], MICROPHONE_RESPONSE)
    rounded = heard / (1 + heard ** 4) ** (1 / 4)
    return filtered(rounded, band_limit)[None]


dry = scene()
out = record(dry)
transcribe(out)
```